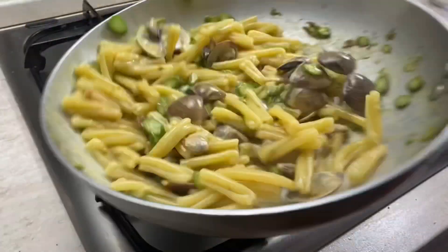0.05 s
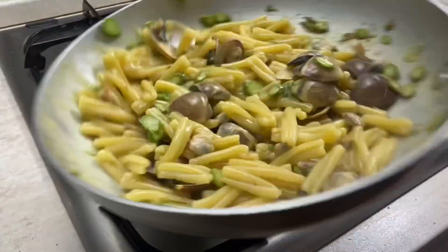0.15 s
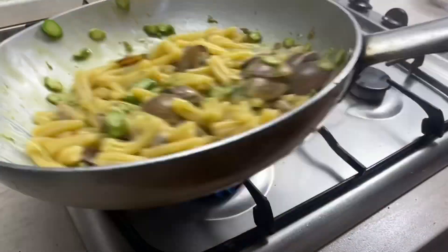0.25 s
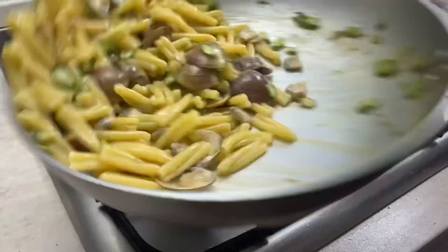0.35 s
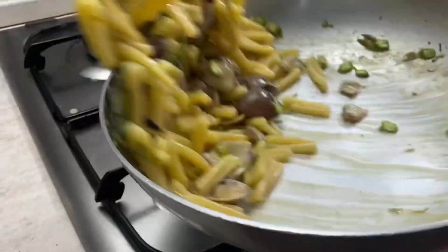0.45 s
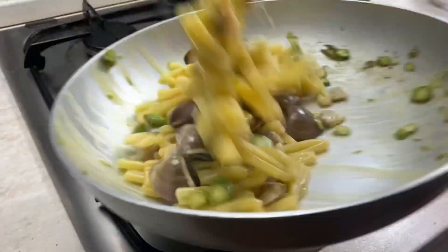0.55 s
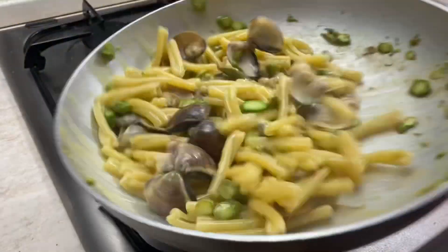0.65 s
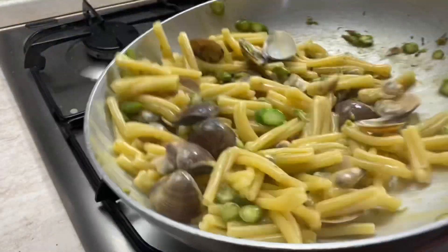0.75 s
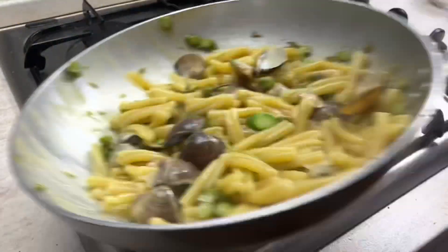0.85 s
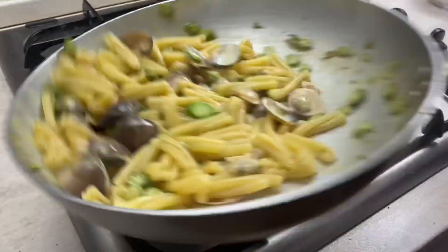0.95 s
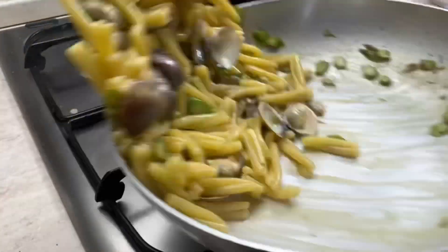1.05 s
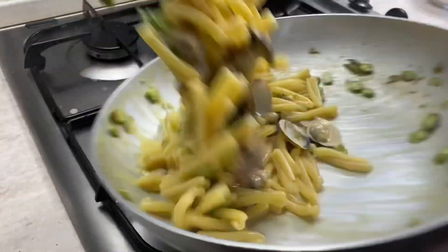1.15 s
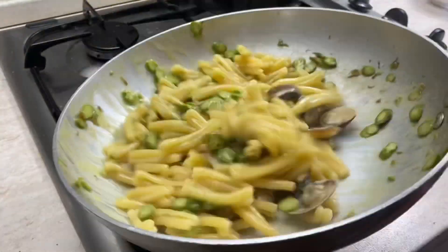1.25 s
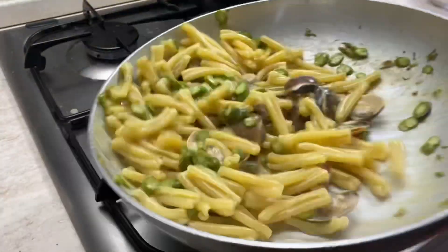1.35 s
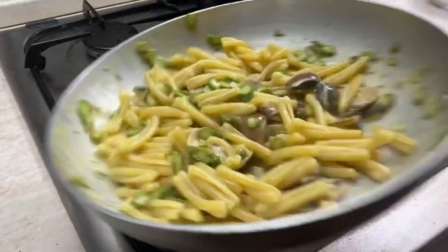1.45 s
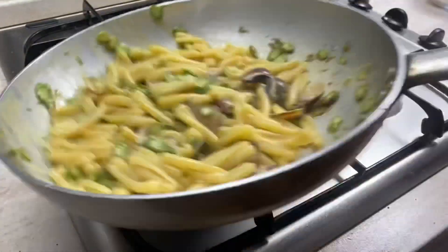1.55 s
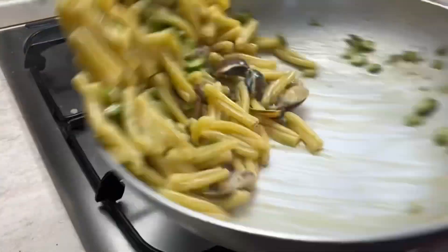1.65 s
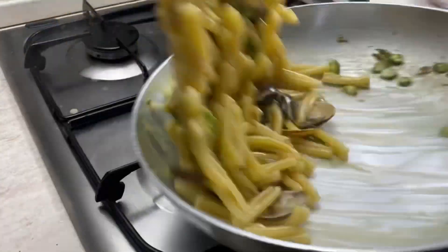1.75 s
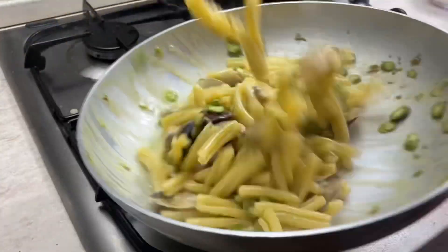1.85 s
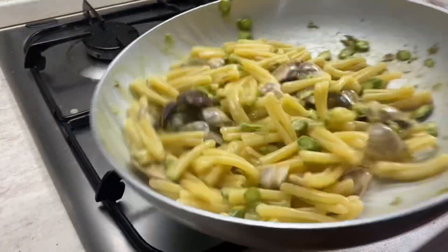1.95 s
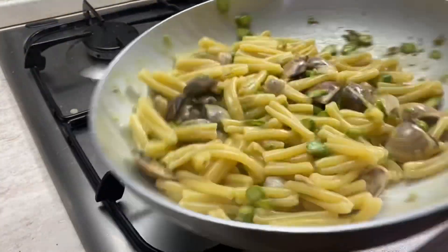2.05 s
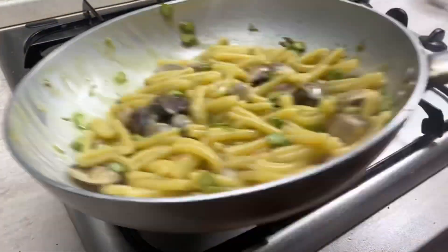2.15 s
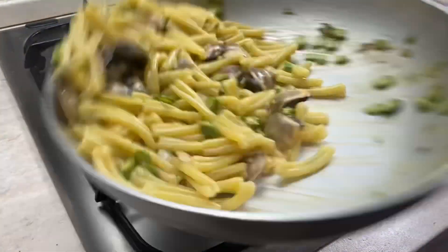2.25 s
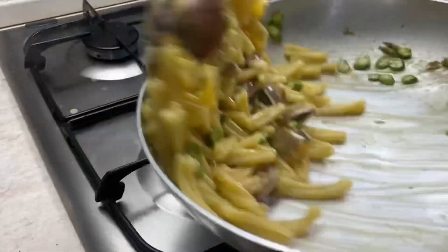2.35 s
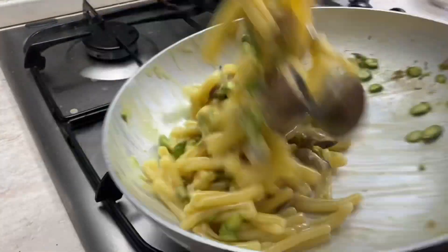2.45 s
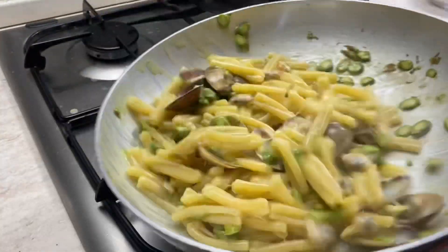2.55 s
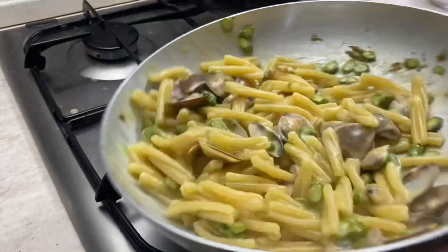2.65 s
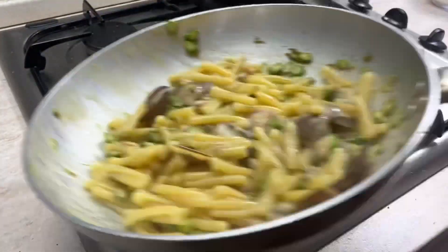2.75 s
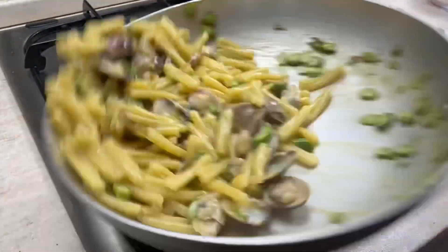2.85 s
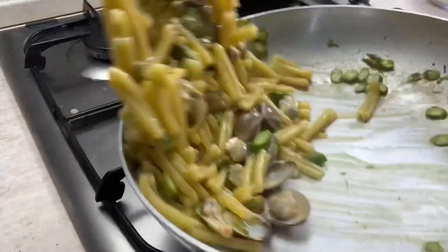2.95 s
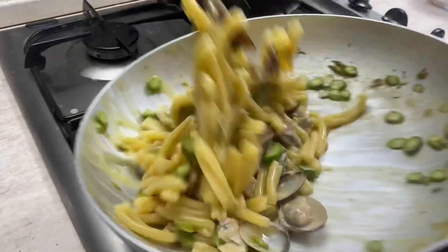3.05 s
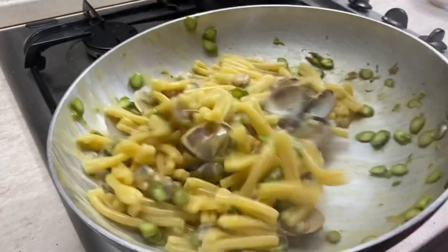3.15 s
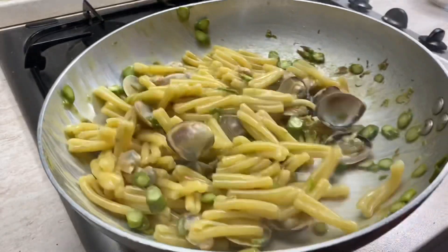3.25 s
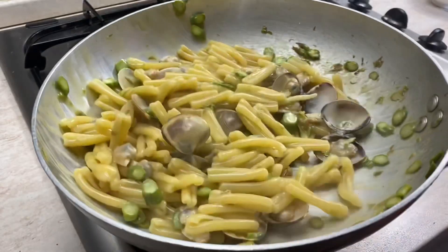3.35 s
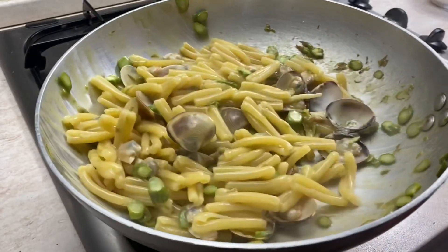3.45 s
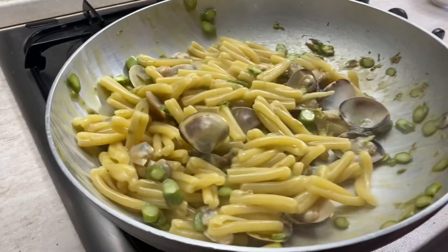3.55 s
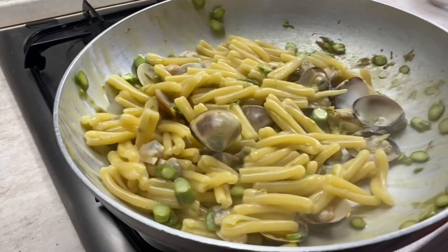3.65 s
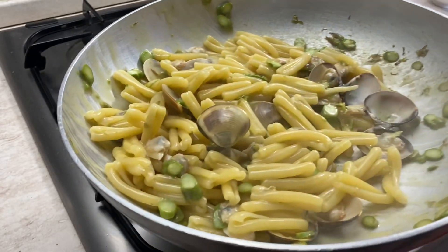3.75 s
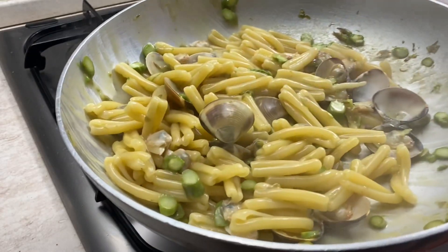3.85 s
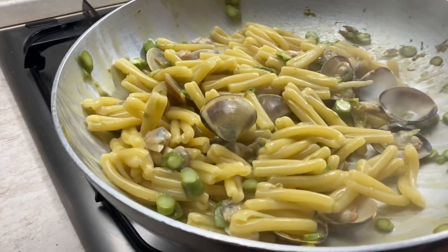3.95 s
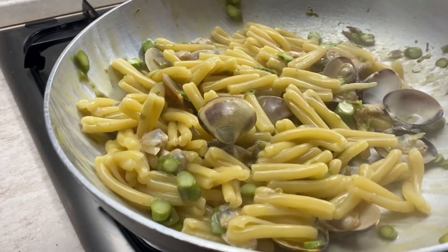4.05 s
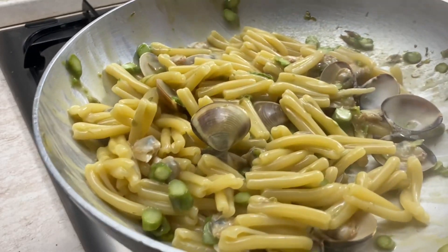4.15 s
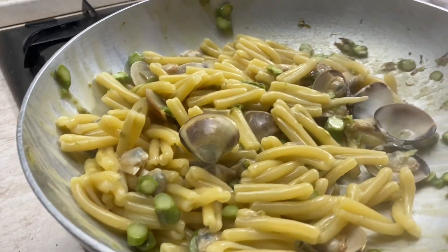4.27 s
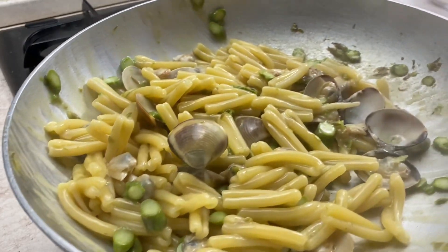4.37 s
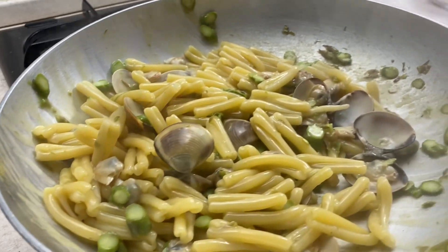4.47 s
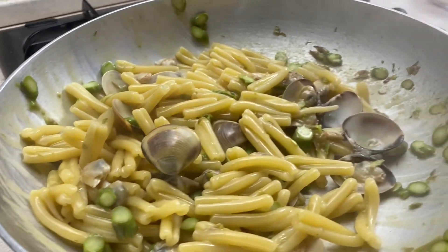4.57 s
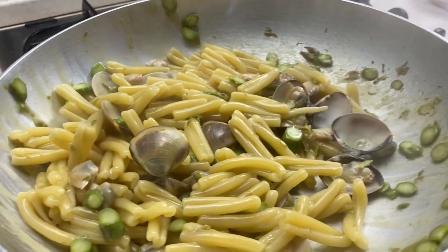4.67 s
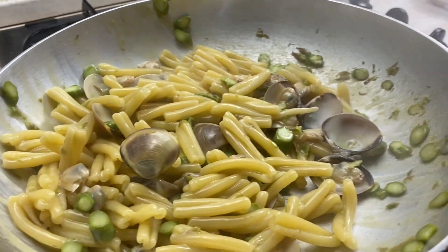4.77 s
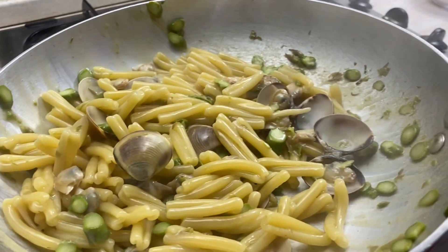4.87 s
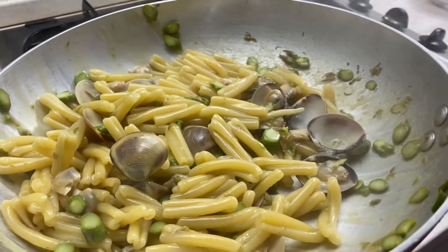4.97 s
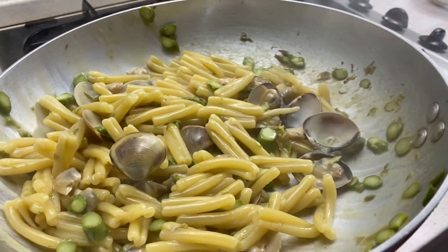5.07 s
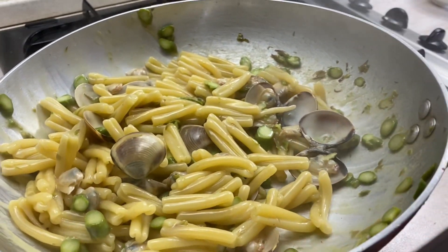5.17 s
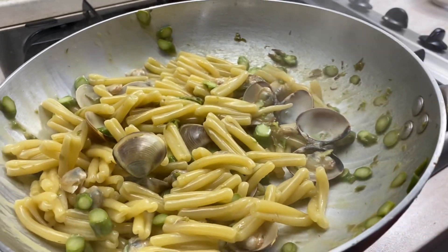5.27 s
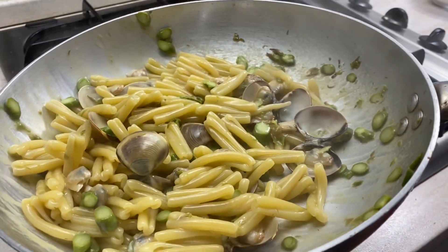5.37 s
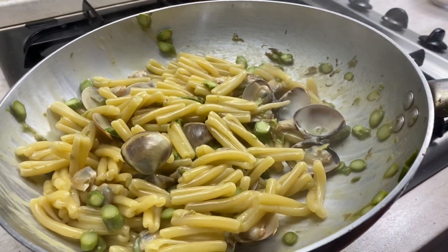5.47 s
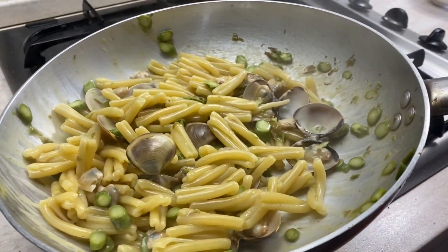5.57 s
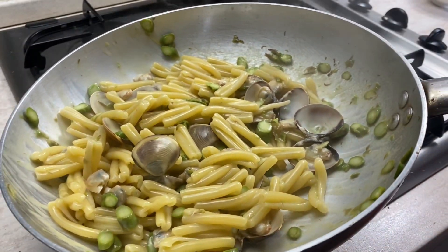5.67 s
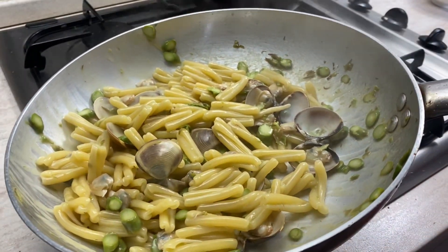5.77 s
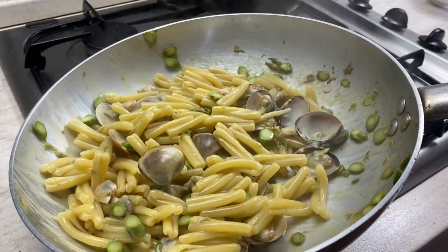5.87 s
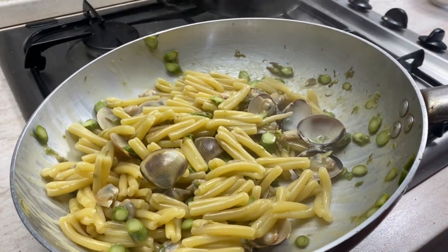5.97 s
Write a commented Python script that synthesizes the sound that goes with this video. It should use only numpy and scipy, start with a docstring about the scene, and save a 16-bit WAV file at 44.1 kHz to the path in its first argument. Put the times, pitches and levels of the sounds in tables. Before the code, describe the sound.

In a small kitchen, heard close and in stereo, pasta with clams is tossed in an aluminium frying pan over a low gas flame. From 0 to 3 seconds the heap slides with a wet, grainy rasp, speeds up, then falls back in clattering loads at about 0.5, 1.1, 1.8, 2.4 and 3.0 seconds. Hard shell clacks, some bright, some muffled by pasta, cluster around the landings, and the pan briefly rings. Tiny squeaks of shell on metal come near 0.3, 1.0 to 1.2 and 2.2; dull knocks at 0.5, 1.2, 1.65 and 2.5. The last load settles with a few weak clicks until about 3.3. Then the pan is still: soft low burner rumble, a very faint simmering hiss with tiny pops, and thin, unsteady high whistles continue quietly. At about 5.9 seconds one soft, dull pan knock ends it.

```python
"""Pasta and clams are tossed in an aluminium frying pan over a gas flame, in a small kitchen.
From the start a burner rumbles (filtered noise) and the sauce faintly simmers (hiss and damped grains).
For three seconds each push and pull makes the heap slide and land: streams of grains for pasta and shells,
with shell clacks (decaying modes and a noise crack), squeaks (gliding tones) and dull knocks (low modes).
Then the pan is still: rumble, simmer and thin whistles go on, and near the end there is one dull knock."""
import sys
import numpy as np
from scipy import signal
from scipy.fft import rfft, irfft, next_fast_len
from scipy.io import wavfile
from scipy.ndimage import uniform_filter1d, map_coordinates

SR = 44100
rng = np.random.default_rng(int(sys.argv[2]) if len(sys.argv) > 2 else 0)


def store_wav(level_fs):
    """Save 16-bit WAV to argv[1]."""
    pcm = np.round(np.clip(np.atleast_2d(level_fs), -1, 1) * 32767)
    wavfile.write(sys.argv[1], SR, pcm.T.astype(np.int16))


N = 265041


def amp(db):
    """Level: decibels become an amplitude ratio."""
    return 10 ** (np.asarray(db) / 20)


def unit(x):
    """Normalisation: the signal is scaled to an rms of 1."""
    return x / np.sqrt(np.mean(x ** 2) + 1e-20)


def along(points, hz):
    """Logarithmic frequency scale: (frequency [Hz], value) points are interpolated on it."""
    f, v = np.transpose(points)
    return np.interp(np.log(hz + 1), np.log(f + 1), v)


def curve(points):
    """Level contour: (time [s], value) points are interpolated to one value per sample."""
    s, value = np.transpose(points)
    return np.interp(np.arange(N) / SR, s, value)


def wobble(rate):
    """Slow random fluctuation: a smooth curve through random knots, rate of them a second."""
    knots = rng.standard_normal(int(N * rate / SR) + 4)
    return map_coordinates(knots, [np.arange(N) * rate / SR])


def filtered(x, response):
    """Linear filtering: the spectrum is multiplied by a complex response of frequency."""
    m = next_fast_len(x.shape[-1] + SR // 4)
    spectrum = rfft(x, m) * response(np.fft.rfftfreq(m, 1 / SR))
    return irfft(spectrum, m)[..., :x.shape[-1]]


def convolved(x, response):
    """Superposition: every sample launches the impulse response, channel by channel."""
    return signal.fftconvolve(np.atleast_2d(x), np.atleast_2d(response), axes=1)[:, :x.shape[-1]]


def coloured(x, spectrum, size=2048):
    """Minimum phase: a causal filter with this spectrum keeps attacks sharp."""
    cepstrum = irfft(np.log(amp(along(spectrum, np.fft.rfftfreq(size, 1 / SR)))))
    # folding the cepstrum onto positive times makes the filter causal
    cepstrum[1:size // 2] *= 2
    cepstrum[size // 2 + 1:] = 0
    return convolved(x, irfft(np.exp(rfft(cepstrum))))


def add(track, s, sound):
    """Superposition: a sound is mixed into a track from time s."""
    slot = track[:, max(round(s * SR), 0):][:, :sound.shape[-1]]
    slot += sound[:, :slot.shape[-1]]


def fade(t, t60):
    """Free exponential decay: 60 dB in t60 seconds."""
    return np.exp(-np.log(1000) * t / np.maximum(t60, 1e-4))


def noise_pair(width, size):
    """Partial coherence: stereo white noise whose side-to-mid ratio is width."""
    mid, side = rng.standard_normal((2, size))
    return unit(np.array([mid + width * side, mid - width * side]))


def grains(rate, low_hz, high_hz, cycles, spread_db, width, size=256):
    """Granular excitation: many tiny damped contacts, each with its own pitch, strength and place."""
    count = int(rate * N / SR)
    when, pitch, strength, place, lag = rng.random((count, 5)).T[:, :, None]
    t = np.arange(size) / SR
    hz = low_hz * (high_hz / low_hz) ** pitch
    gain = amp(spread_db * np.minimum(-np.log(1 - strength), np.pi)) * np.sqrt(hz)
    body = gain * np.exp(-t * hz / cycles) * (1 - np.arange(size) / size)
    index = ((when * N).astype(int) + np.arange(size)).ravel()
    channels = []
    for side in (1, -1):
        balance = 1 + side * width * (place - .5)
        phase = side * width * (2 * lag - 1)
        grain = body * balance * np.sin(2 * np.pi * hz * t + phase)
        channels.append(np.bincount(index, grain.ravel(), N + size)[:N])
    return np.array(channels)


def singing(rows, waver, flutter_db):
    """Frequency and amplitude modulation: narrow, unsteady tones swell, glide and fade."""
    track = np.zeros((2, N))
    for s, length, from_hz, to_hz, db in rows:
        u = np.linspace(0, 1, max(int(length * SR), 2))
        drift, flutter = wobble(250)[:len(u)], wobble(110)[:len(u)]
        hz = (from_hz + (to_hz - from_hz) * u) * (1 + waver * drift)
        tone = unit(np.sin(2 * np.pi * np.cumsum(hz) / SR) * amp(flutter_db * flutter))
        swell = np.sin(np.pi * u)
        add(track, s, (amp(db) * swell * tone)[None])
    return track


# The heap slides twice a toss, as the pan is drawn back and as it is pushed out:
# (time [s], length [s], relative pasta level [dB], relative shell level [dB])
SLIDES = [(0.096, 0.14, -29, -33), (0.23, 0.21, -25, -24.5), (0.732, 0.14, -31, -38.5),
          (0.875, 0.18, -26, -25.5), (1.358, 0.16, -33.5, -30.5), (1.513, 0.23, -24.5, -26),
          (1.999, 0.14, -27, -28), (2.146, .2, -20, -18), (2.64, 0.13, -37, -45), (2.757, 0.19, -23, -22.5)]
# The tossed food falls back in one or two loads:
# (time [s], relative pasta level [dB], relative shell level [dB], settling t60 [s])
LANDINGS = [(-.02, -33, -32, 0.36), (.445, -35, -36.5, 0.33), (.485, -25.5, -26.5, 0.47),
            (.605, -34, -35.5, 0.36), (1.085, -31.5, -32, 0.61), (1.169, -25, -22, 0.4),
            (1.725, -24, -24, 0.64), (1.864, -30.5, -23.5, 0.27), (1.915, -31.5, -30, 0.17),
            (2.365, -25, -31, .25), (2.469, -36.5, -25.5, 0.37), (2.945, -32, -32.5, 0.73),
            (2.99, -34.5, -26, 0.29)]
FALL_S, PILE_S = .02, 0.017  # a load reaches the metal over this time, then keeps piling up this long
PASTA_LAW, SHELL_LAW = 1.05, 1.5  # powers of sliding speed: shells need speed to rattle
LOOSE_DB, LOOSE_T60_S = -14, .4  # pieces that roll on, relative to the heap, and their time to rest


def tossing():
    """Power addition: slides speed up and slow down, loads pile up and settle, loose pieces roll on."""
    t, power = np.arange(N) / SR, np.zeros((2, N))
    for s, length, pasta_db, shells_db in SLIDES:
        speed = np.abs(np.sin(np.pi * np.clip((t - s) / length, 0, 1)))
        pasta, shells = amp(pasta_db) * speed ** PASTA_LAW, amp(shells_db) * speed ** SHELL_LAW
        power += np.array([pasta, shells]) ** 2
    for s, pasta_db, shells_db, t60 in LANDINGS:
        arrival = np.clip((t - s) / FALL_S, 0, 1)
        load = arrival * fade(np.maximum(t - s - FALL_S - PILE_S, 0), t60)
        power += (amp([[pasta_db], [shells_db]]) * load) ** 2
    # loose pieces keep moving for a moment after every motion
    after = fade(t[:SR // 2], LOOSE_T60_S) ** 2
    loose = convolved(power, amp(LOOSE_DB) ** 2 * after / after.sum())
    return np.sqrt(power + np.abs(loose))


def shifting(x, depth_db, size=512):
    """Cavity resonance: hollows between pieces open and close, so bands some hundred Hz wide vary."""
    z = signal.stft(x, nperseg=size)[2]
    field = uniform_filter1d(rng.standard_normal(z.shape[1:]), size=4, axis=0)  # over frequency
    field = uniform_filter1d(field, size=9, axis=1)  # over time
    gain = unit(amp(depth_db * unit(field)))
    return signal.istft(z * gain, nperseg=size)[1][:, :N]


# Modes of the food-damped pan: (frequency [Hz], relative level [dB], t60 [s])
PAN_MODES = [(655, -9, .07), (953, -5, .1), (1025, -6, .1), (1087, -6, .1), (1356, -6, .08),
             (1507, -3, .08), (1741, -3, .13), (2042, -2, .07), (2310, -4, .06), (2455, -1, .06),
             (2934, 0, .06), (3170, -3, .05), (4037, -4, .07), (4355, -6, .06), (5154, -3, .07),
             (5700, -7, .07), (6800, -5, .06), (7547, -6, .07), (8050, -5, .06)]


def pan_ring(x):
    """Modal resonance: every mode of the metal reaches the two microphones with its own phase."""
    t = np.arange(SR // 4) / SR
    common = rng.uniform(0, 2 * np.pi, (len(PAN_MODES), 1, 1))
    phases = common + rng.normal(0, 0.26, (len(PAN_MODES), 2, 1))
    ring = np.zeros((2, len(t)))
    for (hz, db, t60), phase in zip(PAN_MODES, phases):
        ring += amp(db) * fade(t, t60) * np.sin(2 * np.pi * hz * t + phase)
    return convolved(x, ring / np.linalg.norm(ring[0]))


# Filter colour of the wet pasta: (frequency [Hz], relative level [dB])
SQUELCH_COLOUR = [(100, -44.5), (300, -24), (520, -23.5), (640, -13), (800, -14.5), (1000, -5), (1600, 0.5),
                  (2400, 1.5), (3300, -5.5), (5000, -4.5), (9000, -31), (16000, -66.5)]
# Filter colour of shell edges on the metal: (frequency [Hz], relative level [dB])
RATTLE_COLOUR = [(600, -49.5), (1500, -14), (2400, -3), (3100, 0.5), (3800, -4.5), (4500, -2.5),
                 (5900, -4.5), (7800, -6), (8600, -10.5), (10500, -8.5), (12800, -31), (16000, -33)]


def heap(ring_db=-14, squelch_db=-1.5, rattle_db=-1.5, clump_db=1.0, ticks_db=-4):
    """Friction and impact noise: pasta squelches, shell edges rattle, and both stir the pan's modes."""
    pasta_gain, shell_gain = tossing()
    pasta = grains(rate=1900, low_hz=424.8, high_hz=5063, cycles=4.9, spread_db=2.5, width=0.62, size=400)
    pasta = unit(coloured(pasta, SQUELCH_COLOUR))
    # a dense, fine rasp of sauce, with brief rings of single shells in it
    rasp = unit(grains(rate=9000, low_hz=1810, high_hz=13700, cycles=2, spread_db=2.5, width=0.3, size=64))
    rings = unit(grains(rate=600, low_hz=1704, high_hz=8970, cycles=9.8, spread_db=6, width=0.9, size=500))
    shells = unit(coloured(rasp + amp(ticks_db) * rings, RATTLE_COLOUR))
    clumps = clump_db * wobble(70)
    squelch = pasta_gain * amp(squelch_db + clumps) * pasta
    rattle = shell_gain * amp(rattle_db + clumps) * shells
    slide = shifting(squelch + rattle, depth_db=2.5) + squeaks()
    return slide + amp(ring_db) * pan_ring(slide)


# Colour of the flame noise: (frequency [Hz], relative level [dB])
FLAME_COLOUR = [(20, -14.5), (32, -8.0), (48, 2.5), (70, -4.5), (130, 0.5), (210, -11.0), (400, -15.5),
                (700, -22.5), (1100, -21.0), (1450, -24.5), (1800, -25.5), (2600, -34.5), (5000, -49.5),
                (12000, -77.5)]
# Level of the low background rumble, which dips briefly: (time [s], level [dB])
RUMBLE_LEVEL = [(0, -65), (.35, -54.5), (.6, -49), (1.5, -52), (2.45, -49.5), (2.62, -65.5), (2.85, -52),
                (3.3, -52.5), (6, -53)]


def burner():
    """Combustion noise: the gas flame is random noise, strongest at low frequencies."""
    def deep_response(hz):
        return amp(along(FLAME_COLOUR, hz)) * hz / np.hypot(hz, 26)

    def airy_response(hz):
        return amp(along(FLAME_COLOUR, hz) + along([(20, -17.0), (200, -11.5), (600, -2.0)], hz))

    # the deep rumble is the same in both channels, the rush above it is not
    deep = filtered(rng.standard_normal(N), deep_response)
    airy = filtered(rng.standard_normal((2, N)), airy_response)
    return amp(curve(RUMBLE_LEVEL) + .8 * wobble(4.9)) * unit(deep + airy)


# Colour of the sauce's hiss and bubbles: (frequency [Hz], relative level [dB])
SIZZLE_COLOUR = [(300, -31), (1500, -8.5), (2400, -8.5), (3000, -4.5), (3800, -4.0), (4700, -3.5),
                 (5100, -4.0), (5800, -11.0), (7100, -3.0), (7800, -6.5), (9500, -2.0), (11500, -10.5),
                 (13000, -21.5), (15000, -20.0)]
# Level of the simmering hiss: (time [s], level [dB])
SIMMER_LEVEL = [(3.4, -67), (4, -68.5), (4.7, -70.5), (6, -69.5)]


def simmer(pops_db=-12):
    """Bubble noise: the sauce hisses as filtered noise and spits tiny bubbles as damped grains."""
    hiss = noise_pair(width=0.19, size=N)
    hiss = unit(filtered(hiss, lambda hz: amp(along(SIZZLE_COLOUR, hz))))
    pops = grains(rate=140, low_hz=2494, high_hz=12000, cycles=2.7, spread_db=6.5, width=.6)
    pops = unit(coloured(pops, SIZZLE_COLOUR))
    return amp(curve(SIMMER_LEVEL)) * (hiss + amp(pops_db) * pops)


# The loudest shell strikes:
# (time [s], relative level [dB], shell pitch [Hz], treble balance, neutral at -10 [dB])
CLACKS = [(0.0535, -18.5, 6550, -9.5), (0.0996, -14.5, 4160, -18), (.1374, -15, 3160, -21.5),
          (0.3398, -10.5, 2880, -17), (0.4918, -16, 2380, -4), (0.4971, -7.5, 2370, -4.5),
          (0.5267, -4, 7190, -9.5), (.5517, -10.5, 2270, -4), (0.616, -10, 3003, -8),
          (0.6609, -12.5, 2830, -21), (0.7778, -21.5, 2390, -12), (0.9044, -17, 2190, -7.5),
          (1.164, -13.5, 2190, -13), (1.1792, -12.5, 6630, -4), (1.1909, -3.5, 8150, -6.5),
          (1.235, -13.5, 7300, -7), (1.2552, -12.5, 3800, -10.5), (1.275, -6.5, 3400, -12.5),
          (1.3575, -12.5, 3430, -18), (1.3813, -16.5, 2915, -17.5), (1.5288, -17, 2710, -15),
          (1.7933, -10, 2270, -21), (1.841, -5.5, 7070, -10.5), (1.8646, -6.5, 7620, -9.5),
          (1.873, -6, 2460, -12), (2.065, -8.5, 2260, -14.5), (2.3777, -14.5, 2290, -25.5),
          (2.4604, -7, 7270, -7.5), (2.4749, -7, 2870, -12), (2.5044, -2.5, 3300, -14.5),
          (2.5132, -10, 3220, -17.5), (2.5406, -7, 2460, -12.5), (2.7824, -13.5, 3080, -12),
          (2.826, -9, 2510, -11.5), (2.8542, -8.5, 3160, -20.5), (2.9979, -9, 4630, -5),
          (3.0794, -20, 2560, -10), (3.2011, -20, 6960, -14), (3.2383, -19.5, 3065, -21.5)]
# Modes of a clam shell: (multiple of its pitch [ratio], relative level [dB])
SHELL_MODES = [(.45, -18), (.62, -11), (.8, -8), (.95, -2), (1.04, -1.5), (1.27, -4), (1.55, -6),
               (2.05, -5.5), (2.7, -12)]
# Colour of the contact noise: (frequency [Hz], relative level [dB])
CRACK_COLOUR = [(300, -30), (1200, -4.5), (3000, -2.5), (7500, 2.5), (10500, -3.5), (13000, -26),
                (16000, -23.5)]
SHELL_T60_S = .015  # how long a struck shell rings


def clacks(crack_db=2, crack_t60=0.015, ring_db=-19, level_db=-8, chatter_db=-7, shelf=0.95):
    """Impact excitation: a shell rings for milliseconds and chatters once; the blow also rings the pan."""
    shells, t = np.zeros((2, N)), np.arange(SR // 16) / SR
    ratio, level = np.transpose(SHELL_MODES)[:, :, None, None]
    for s, db, pitch, treble_db in CLACKS:
        hz = pitch * ratio * rng.normal(1, 0.013, ratio.shape)
        phase = rng.uniform(0, 2 * np.pi, ratio.shape) + rng.normal(0, 0.35, (len(SHELL_MODES), 2, 1))
        # sauce muffles the highest modes
        muffle_db = along([(7900, 2.0), (9000, -11), (14000, -29.5)], hz)
        gain = amp(level + rng.normal(0, 0.55, ratio.shape) + muffle_db)
        ring = np.sum(gain * np.sin(2 * np.pi * hz * t + phase), axis=0) * fade(t, SHELL_T60_S)
        crack = unit(coloured(noise_pair(width=0.46, size=len(t)), CRACK_COLOUR)) * fade(t, crack_t60)
        onset = 1 - np.exp(-t / 0.00036)
        hit = (ring + amp(crack_db) * crack) * onset
        add(hit, rng.uniform(0.00066, .0025), amp(chatter_db) * hit)
        # a bare edge strikes brightly, one cushioned by pasta dully
        hardness_db = shelf * (treble_db + 10.0)
        hit = coloured(hit, [(4200, 0.0065), (6800, hardness_db), (14000, 2.4 * hardness_db)], size=256)
        # levels refer to the first 4 ms
        add(shells, s, amp(db + level_db) * hit / np.std(hit[:, t < .004]))
    return shells + amp(ring_db) * pan_ring(shells)


# Shell edges squeaking along the metal:
# (start [s], length [s], first frequency [Hz], last frequency [Hz], level before the swell [dB])
SQUEAKS = [(.3, .1, 3000, 3150, -31), (.99, .065, 2240, 2270, -27), (1.09, .05, 2230, 2200, -37),
           (1.155, .05, 1330, 1290, -29), (2.22, .06, 2480, 2400, -26)]


def squeaks():
    """Frictional tone: shell edges on metal sing as narrow, strongly wavering tones."""
    return singing(SQUEAKS, waver=0.044, flutter_db=3.0)


# Dull knocks of the pan: (time [s], thud peak level [dB], rumble relative to the thud [dB])
KNOCKS = [(0.496, -34.5, -14.5), (1.199, -20, -19.5), (1.642, -26.5, -28), (2.502, -25, -16.5),
          (5.94, -33, -9.5)]
# Low modes of the whole pan and its handle: (frequency [Hz], relative level [dB], t60 [s])
THUD_MODES = [(126, -8, 0.046), (304, -8.5, .07), (393, -7.5, 0.051), (660, -3.5, 0.047), (865, 10, .035),
              (1860, -3, .035), (2750, -15, .04)]
# Colour of the rumble after a knock: (frequency [Hz], relative level [dB])
RUMBLE_COLOUR = [(80, -6.5), (210, -6.5), (310, 1.5), (480, -5.5), (680, -2), (880, -0.5), (1150, -17),
                 (3000, -33), (8000, -58.5)]


def knocks():
    """Low-mode excitation: the weight of the food or a bump gives a short knock that rumbles on."""
    track, t = np.zeros((2, N)), np.arange(SR // 4) / SR
    for s, db, rumble_db in KNOCKS:
        thud = np.zeros(len(t))
        for hz, level, t60 in THUD_MODES:
            thud += amp(level) * fade(t, t60) * np.sin(2 * np.pi * hz * rng.normal(1, .015) * t)
        rumble = unit(coloured(noise_pair(width=0.29, size=len(t)), RUMBLE_COLOUR)) * fade(t, t60=0.2)
        add(track, s, amp(db) * (thud / np.abs(thud).max() + amp(rumble_db) * rumble))
    return track


# Thin whistles of steam and the gas jet:
# (start [s], length [s], first frequency [Hz], last frequency [Hz], level before the swell [dB])
WHISTLES = [(3.1, 1.8, 5100, 5090, -78), (4.09, .17, 4340, 4280, -76), (4.4, 1.7, 5090, 5110, -78),
            (2.5, 3.8, 1470, 1465, -73)]


def whistles():
    """Jet tone: steam and the gas jet whistle as faint, narrow tones of unsteady pitch."""
    return singing(WHISTLES, waver=0.01393, flutter_db=-1.5)


# Reverberation of the room: (frequency [Hz], t60 [s])
KITCHEN_DECAY = [(150, .35), (900, 0.14), (1900, 0.38), (3500, 0.34), (7000, 0.2), (14000, 0.4)]


def kitchen(x, walls_db=-12, tail_db=-13):
    """Reverberation: hob and tiles answer within a few milliseconds, then the room dies away."""
    hz, t, z = signal.stft(rng.standard_normal((2, SR // 2)), SR, nperseg=256)
    decay = fade(t, along(KITCHEN_DECAY, hz)[:, None])
    tail = signal.istft(z * decay, SR, nperseg=256)[1][:, :SR // 2]
    t = np.arange(SR // 2) / SR
    walls = rng.standard_normal(tail.shape) * fade(t, 0.016) * (t > .002)
    tail = tail * (t > .006)
    early = amp(walls_db) * walls / np.linalg.norm(walls[0])
    late = amp(tail_db) * tail / np.linalg.norm(tail[0])
    return convolved(x, early + late)


def scene():
    """Superposition: the pan and its reverberation are heard over the burner, simmer and whistles."""
    pan = heap() + clacks() + knocks()
    return pan + kitchen(pan) + burner() + simmer() + whistles()


# Treble colour of the whole sound: (frequency [Hz], level [dB])
TREBLE_COLOUR = [(10800, 0), (11400, 2), (12000, -8.5), (14300, 0), (16000, -5)]
# Phase between the microphones: (frequency [Hz], lead of left over right [rad])
PHASE_LEAD = [(120, 0), (250, -.3), (450, -.25), (700, .65), (1300, .65), (1900, .35), (3000, 1.35),
              (3900, .55), (5800, .6), (6800, 0), (8100, -1.9), (8500, -3.3), (9700, -6.1), (10600, -6.6),
              (12000, -9.4), (15500, -15)]
# Level between the microphones: (frequency [Hz], left minus right [dB])
LEVEL_LEAN = [(150, 1), (380, -1), (700, -3.5), (1290, -1), (2380, 2), (3200, 3), (4400, 3), (8000, -0.5)]
TOP_HZ = 16200  # band limit


def record(dry):
    """Two-channel transmission: phase and level differ, treble is coloured, peaks round off, band ends."""
    sides = np.array([[.5], [-.5]])

    def response(hz):
        gain = amp(along(TREBLE_COLOUR, hz) + sides * along(LEVEL_LEAN, hz))
        return gain * np.exp(1j * sides * along(PHASE_LEAD, hz))

    pair = filtered(dry, response)
    rounded = pair / (1 + (np.abs(pair) / .95) ** 6) ** (1 / 6)
    return filtered(rounded, lambda hz: hz < TOP_HZ)


dry = scene()
out = record(dry)
store_wav(out)
```